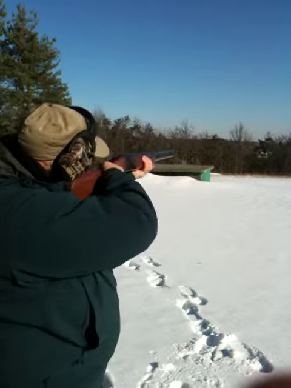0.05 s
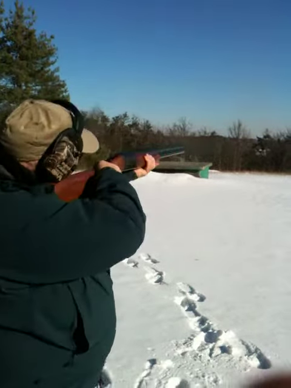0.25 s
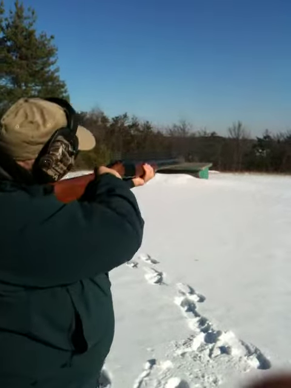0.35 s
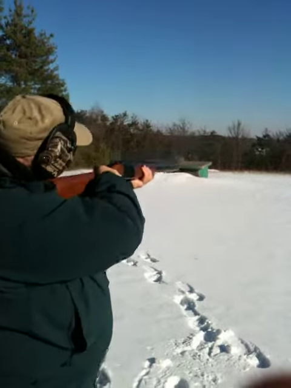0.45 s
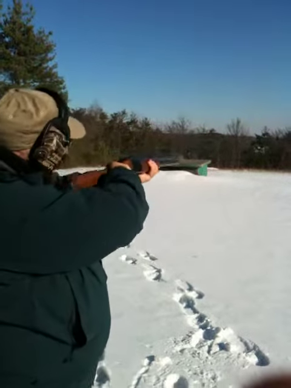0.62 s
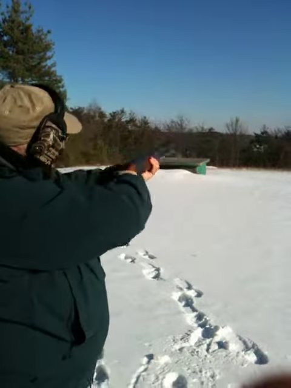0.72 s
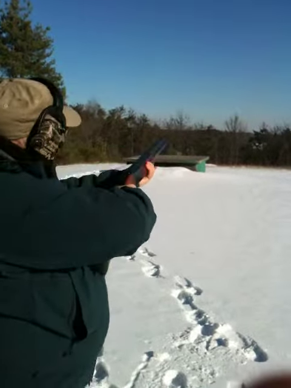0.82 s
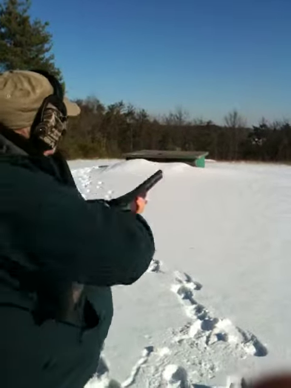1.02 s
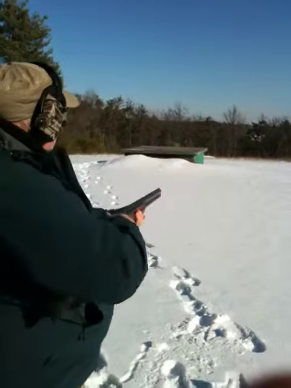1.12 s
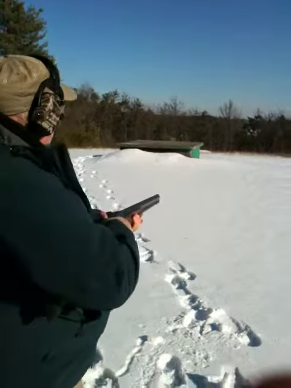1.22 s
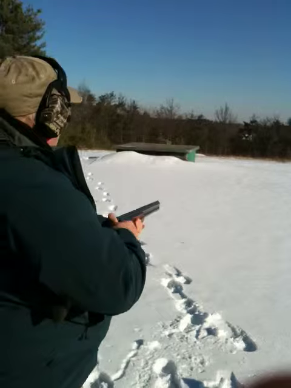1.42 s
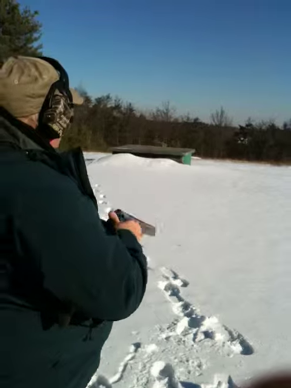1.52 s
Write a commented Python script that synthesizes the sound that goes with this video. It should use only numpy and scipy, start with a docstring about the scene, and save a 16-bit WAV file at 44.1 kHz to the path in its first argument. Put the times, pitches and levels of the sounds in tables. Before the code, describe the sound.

One loud shotgun shot fires at about 0.25 seconds, just after a faint click and jacket rustle, so close that it overloads the microphone. Hard echoes return from nearby trees until 0.45 seconds, and a long, darkening roll fades across the open field through 1.5 seconds. From about 1 second the jacket rustles faintly, with two tiny gun clicks near 1.2 seconds. Soft wind buffets touch the microphone throughout.

```python
"""A faint click and a rustle of jacket, then one shotgun shot over an open snowy field.
The microphone stands beside the shooter, so close that the muzzle blast overloads it.
Nearby trees throw back hard echoes, and the far woods return a long, darkening roll.
As it fades the gun is lowered, with more rustle and two small clicks.
Soft buffets of air touch the microphone before and after the shot."""
import sys
import numpy as np
from scipy import signal
from scipy.fft import rfft, irfft
from scipy.io import wavfile

SR = 44100
rng = np.random.default_rng(int(sys.argv[2]) if len(sys.argv) > 2 else 0)


def store_wav(level_fs):
    """Save 16-bit WAV to argv[1]."""
    pcm = np.round(np.clip(np.atleast_2d(level_fs), -1, 1) * 32767)
    wavfile.write(sys.argv[1], SR, pcm.T.astype(np.int16))


N = 68355
T = np.arange(N) / SR

# Surges of the blast. Each row: onset in seconds, hold in seconds, t60 in seconds, level in dB,
# then hiss and body in dB relative to that level.
BLAST_SURGES = [(0.2404, 0.0014, 0.0084, -16, -4, -4), (.2440, .0012, 0.003, 3, -5, -10),
                (0.2457, .0022, 0.0026, 7, -20.5, -11), (0.2661, .004, 0.021, -17, -1.5, -9.5),
                (0.2717, 0.0039, .03, -2.5, -10.5, -17), (0.282, .009, 0.061, -9.5, -12, -23.5)]
# Pressure swings that thump the microphone.
# Each row: start in seconds, pitch in Hz, t60 in seconds, level in dB.
BLAST_THUMPS = [(.2405, 235, .04, -17), (.2468, 250, .022, -9), (.2685, 230, .035, -20),
                (.2815, 240, .035, -23), (.3235, 160, .05, -20)]
# Overload cracks. Each row: time in seconds, peak in dB ahead of the microphone's limit.
OVERLOAD_CRACKS = [(.2499, -2), (.2510, 2), (.2515, -1.5), (.2584, -6.5), (.2590, -6), (.2594, -4.5)]
# Colours of the shot and its near echoes. Each row: frequency in Hz, relative level in dB.
RING_SPECTRUM = [(40, -35), (200, -5), (380, -14.5), (600, -7), (780, -23.5), (950, -12.5), (1500, -2.5),
                 (1800, -4), (2100, -5), (2700, 1), (3000, -8.5), (3300, -5), (3800, -16), (6000, -24),
                 (16000, -27)]
HISS_SPECTRUM = [(500, -12.5), (2500, -2), (5000, -0.5), (6800, -3), (10500, 1.5), (12500, -7),
                 (16000, -13.5)]
BODY_SPECTRUM = [(60, -55.5), (150, -40), (300, -17), (550, -5.5), (760, 4.5), (1000, -5), (1400, -12),
                 (2500, -20.5), (8000, -57)]
ECHO_SPECTRUM = [(100, -28), (400, -11), (800, -20.5), (1100, -6.5), (1600, -9), (1900, -5.5), (2200, -0.5),
                 (2800, -2.5), (3500, -17.5), (4600, -9.5), (7000, -22), (10300, -19), (12500, -45),
                 (16000, -38.5)]
# Echoes off nearby trees. Each row: onset in seconds, hold in seconds, level in dB, body in relative dB.
TREE_ECHOES = [(0.3162, 0.0042, -17.5, -4), (0.3421, .005, -15.5, -33), (0.355, 0.0078, -21, -28),
               (0.3603, 0.0024, -23, -2.5), (0.369, 0.0039, -11, -8.5), (0.374, 0.0025, -16, -12),
               (0.389, .001, -24, -22), (0.4015, .003, -21, 0.5), (0.413, 0.0015, -23, 6.5),
               (0.4226, 0.0037, -26.5, -4.5), (0.431, 0.025, -22.5, -16), (0.664, 0.024, -46.5, 13)]
# Decay of the far woods. Each row: frequency in Hz, early level in relative dB, early t60 in seconds,
# late level in relative dB, late t60 in seconds.
ROLL_DECAY = [(60, -38.5, .5, -67, 3), (130, -43, 0.76, -74, 2.5), (231, -51, 1, -54, 3.33),
              (425, -31.5, 1, -38.5, 2.67), (706, -51, 0.31, -27, 2.25), (927, -29, 1, -33, 2.19),
              (1370, -30.5, .9, -30, 1.9), (2270, -22.5, 0.81, -27, 1.58), (2996, -23.5, .85, -31, 1.33),
              (3650, -26, 0.68, -46, 1.74), (5060, -30, 0.66, -48.5, 1.5), (6900, -38.5, 0.63, -60.5, 2.03),
              (9900, -31, 0.51, -55.5, 1.9), (12270, -39, 0.28, -87, 1.5), (16000, -53, 0.33, -74, 1.5)]
# Uneven returns from the tree line. Each row: centre in seconds, half width in seconds, gain in dB.
ROLL_SWELLS = [(.415, 0.017, 1), (.485, .02, -1), (.535, .015, 2.5), (0.571, 0.018, -4), (.65, 0.079, 1.5),
               (1.29, .02, 2.5)]
# Small clicks of the gun. Each row: start in seconds, level in dB.
GUN_CLICKS = [(0.0647, -48.5), (1.147, -55), (1.245, -58.5)]
# Colours of the gun and jacket at close range. Each row: frequency in Hz, relative level in dB.
CLICK_SPECTRUM = [(800, -15), (2500, -3), (4500, -6), (5900, 5), (6800, -14), (16000, -35)]
DULL_CLOTH_SPECTRUM = [(200, -12), (1200, -6), (2400, 0), (3800, -7), (6000, -11), (8000, -21),
                       (16000, -30)]
BRIGHT_CLOTH_SPECTRUM = [(300, -20), (1500, -12), (4500, 0), (7000, -6), (9500, 1), (11500, -1),
                         (13000, -7), (15500, -11), (17000, -30)]
# Buffets on the microphone. Each row: start in seconds, pitch in Hz, t60 in seconds, level in dB.
AIR_BUFFETS = [(0.1043, 130, 0.067, -38), (0.173, 174, 0.072, -35), (0.449, 120.6, 0.24, -53.5),
               (0.661, 130, 0.073, -52), (.93, 117, 0.13, -47), (0.998, 137, 0.068, -48),
               (1.223, 190, 0.038, -39.5), (1.271, 132.4, 0.074, -43.5), (1.456, 166, .08, -50)]
# Colours of the wind and the field's hiss. Each row: frequency in Hz, relative level in dB.
WIND_SPECTRUM = [(25, -18), (55, -10.5), (110, -1.5), (170, -6), (280, -14.5), (800, -35.5), (3000, -71.5)]
FIELD_SPECTRUM = [(30, -20.5), (150, 2), (400, 5.5), (1000, 1), (2400, -4.5), (3500, -10.5), (5800, -7),
                  (7000, -14), (10500, -8), (16000, -22.5)]


def muzzle_blast():
    """Beside the gun: ringing surges with hollow body and hiss, low thumps and needle-like cracks."""
    ring, hiss, body = noise(RING_SPECTRUM), noise(HISS_SPECTRUM), noise(BODY_SPECTRUM)
    # A sizzle hangs on behind the surges.
    blast = from_db(-22.5) * envelope(.242, rise=.00042, hold=.038, t60=.25) * noise(HISS_SPECTRUM)
    for onset, hold, t60, db, hiss_db, body_db in BLAST_SURGES:
        surge = ring + from_db(hiss_db) * hiss + from_db(body_db) * body
        blast += from_db(db) * envelope(onset, rise=.00042, hold=hold, t60=t60) * surge
    for start, hz, t60, db in BLAST_THUMPS:
        blast += pressure_swing(start, hz, t60, db, rise=.002)
        blast += pressure_swing(start, hz=70, t60=t60, db=db - 26, rise=.002)  # faint deep bass
    crack_half_width_s = .00007
    for time, db in OVERLOAD_CRACKS:
        blast += from_db(db) * np.maximum(1 - np.abs(T - time) / crack_half_width_s, 0)
    return blast


def tree_echoes():
    """Each group of nearby trees scatters the blast into a hard burst with a rounder, hollow body."""
    crack, body = noise(ECHO_SPECTRUM), noise(BODY_SPECTRUM)
    echoes = np.zeros(N)
    for onset, hold, db, body_db in TREE_ECHOES:
        echoes += from_db(db) * envelope(onset, rise=.00033, hold=hold, t60=.028) * crack
        echoes += from_db(db + body_db) * envelope(onset, rise=.003, hold=hold, t60=.026) * body
    return echoes


def woods_roll():
    """Countless echoes from far across the field: each band dies in a fast and a slow stage."""
    start_s, rise_s, gain_db = .33, .037, 15.5
    age = T - start_s
    edges_hz = np.geomspace(45, 17000, 35)
    white = rng.standard_normal((2, N))  # neighbouring bands take different noise
    shared_flutter_db = 1.14 * drift(rate_hz=70)
    roll = np.zeros(N)
    for k, (low, high) in enumerate(zip(edges_hz, edges_hz[1:])):
        band = signal.sosfilt(signal.butter(2, [low, high], "band", fs=SR, output="sos"), white[k % 2])
        centre_hz = np.sqrt(low * high)
        early_db, early_t60, late_db, late_t60 = [at_hz(ROLL_DECAY, centre_hz, c) for c in (1, 2, 3, 4)]
        early = from_db(early_db) * fade(age, early_t60)
        late = from_db(late_db) * fade(age, late_t60)
        flutter_db = shared_flutter_db + .84 * drift(rate_hz=50)
        roll += band * np.hypot(early, late) * from_db(flutter_db)
    swells_db = sum(db * np.exp(-((T - centre) / width) ** 2) for centre, width, db in ROLL_SWELLS)
    return from_db(gain_db + swells_db) * np.clip(age / rise_s, 0, 1) * roll


def gun_clicks():
    """Close by, the gun gives small, bright clicks that die at once."""
    strikes = sum(from_db(db) * (T >= start) * fade(T - start, t60=.0079) for start, db in GUN_CLICKS)
    return strikes * noise(CLICK_SPECTRUM)


def jacket_rustle():
    """Cloth rubs unevenly near the microphone: dull as the gun comes up, bright as it is lowered."""
    shouldering = from_db(-61) * envelope(.185, rise=.13, hold=.045, t60=.1)
    lowering = from_db(-62) * envelope(1.03, rise=.22, hold=.13, t60=.4)
    roughness_db = 2.5
    return sum(move * from_db(roughness_db * drift(rate_hz=120)) * noise(cloth)
               for move, cloth in [(shouldering, DULL_CLOTH_SPECTRUM), (lowering, BRIGHT_CLOTH_SPECTRUM)])


def open_air():
    """Light wind and buffets on the microphone, over the faint hiss of the field."""
    buffets = sum(pressure_swing(*buffet, rise=.0027) for buffet in AIR_BUFFETS)
    wind = from_db(-61.5) * envelope(.11, rise=.056, hold=0, t60=15) * noise(WIND_SPECTRUM)
    field_hiss = from_db(-65.5) * noise(FIELD_SPECTRUM)
    return field_hiss + wind + buffets


def pressure_swing(start, hz, t60, db, rise):
    """A few dying cycles of air pressure at the microphone."""
    age = np.maximum(T - start, 0)
    attack = 1 - np.exp(-age / rise)
    return -from_db(db) * np.sin(2 * np.pi * hz * age) * attack * fade(age, t60)


def envelope(onset, rise, hold, t60):
    """Rise to full level by the onset, hold, die away; all in seconds."""
    return np.clip(1 + (T - onset) / rise, 0, 1) * fade(T - onset - hold, t60)


def fade(age, t60):
    """Fall 60 dB every t60 seconds from age zero on."""
    return from_db(-60 * np.clip(age / t60, 0, 5))


def noise(spectrum):
    """Steady noise of the given colour, rms 1."""
    return shaped_noise(lambda hz: from_db(at_hz(spectrum, hz)))


def drift(rate_hz):
    """Random wavering, mostly slower than rate_hz, rms 1."""
    return shaped_noise(lambda hz: 1 / (1 + (hz / rate_hz) ** 2))


def shaped_noise(gain_at):
    """White noise weighted by a gain at each frequency, rms 1."""
    hz = np.arange(N // 2 + 1) * SR / N
    shaped = irfft(rfft(rng.standard_normal(N)) * gain_at(hz), N)
    return shaped / np.sqrt(np.mean(shaped ** 2) + 1e-20)


def at_hz(table, hz, column=1):
    """Read a column of a table on a log-frequency axis."""
    table = np.array(table)
    return np.interp(np.log(hz + 1e-9), np.log(table[:, 0]), table[:, column])


def from_db(db):
    """Decibels to gain."""
    return 10 ** (np.asarray(db) / 20)


def scene():
    """Everything that reaches the one microphone beside the shooter."""
    return (muzzle_blast() + tree_echoes() + woods_roll() + gun_clicks() + jacket_rustle() + open_air())[None]


def record(dry):
    """The microphone overloads, the deep bass is cut, the recorder caps the peaks and the top is cut."""
    microphone_limit, recorder_limit = from_db(-4), .72
    low_cut = signal.butter(2, 91, "high", fs=SR, output="sos")
    high_cut = signal.ellip(10, .2, 80, 15600, fs=SR, output="sos")
    overloaded = np.clip(dry, -microphone_limit, microphone_limit)
    thinned = signal.sosfilt(low_cut, overloaded)
    capped = np.clip(thinned, -recorder_limit, recorder_limit)
    return signal.sosfilt(high_cut, capped)


dry = scene()
out = record(dry)
store_wav(out)
```